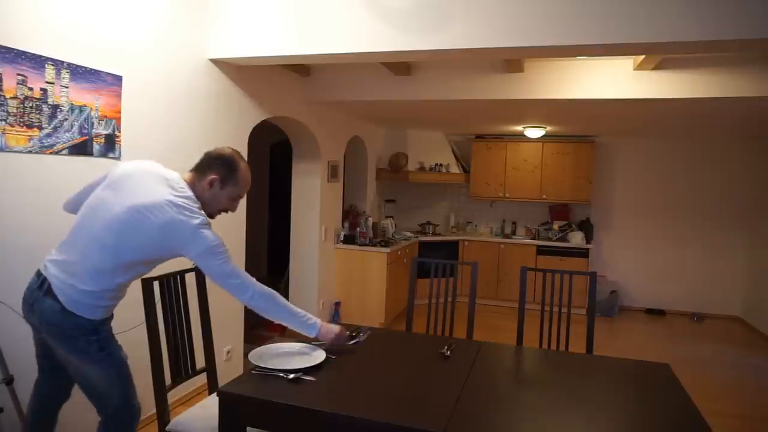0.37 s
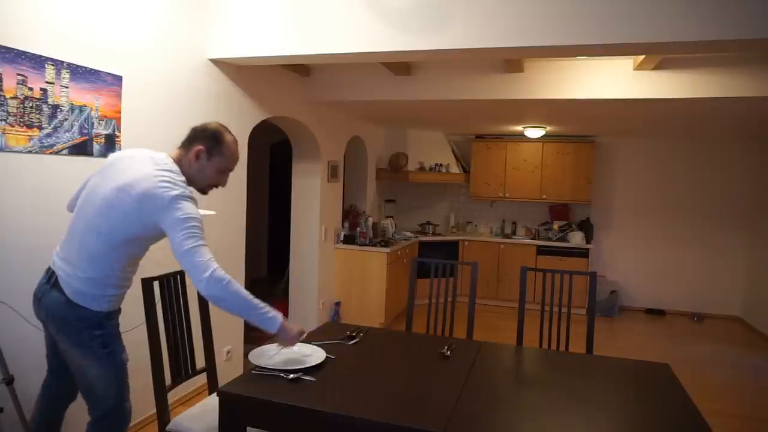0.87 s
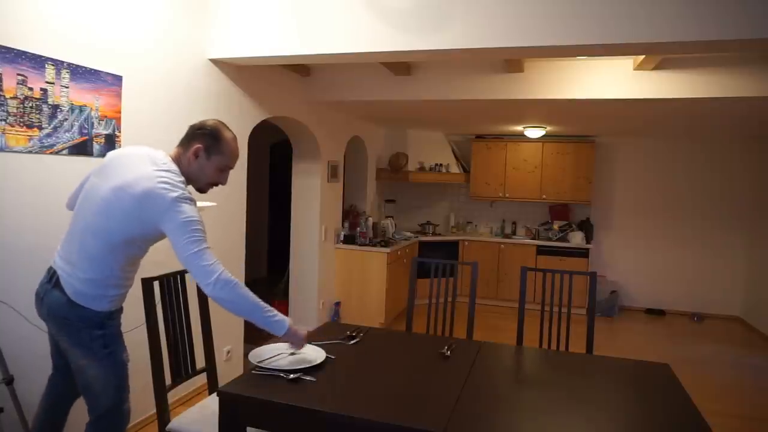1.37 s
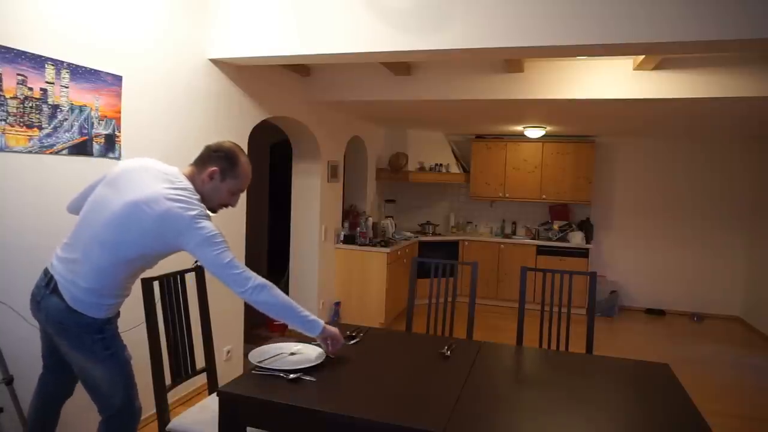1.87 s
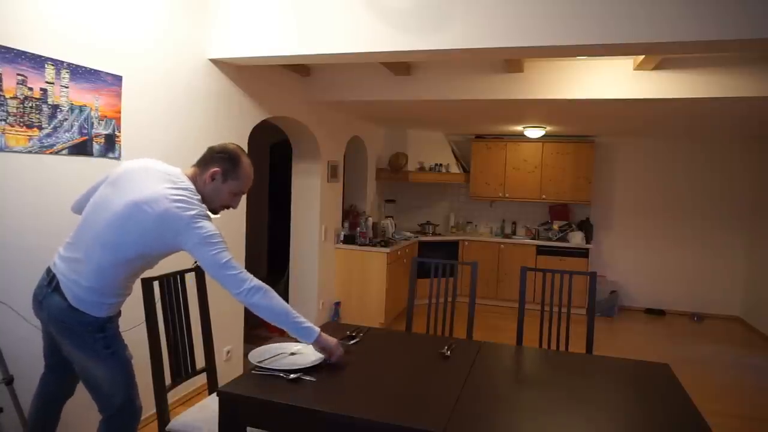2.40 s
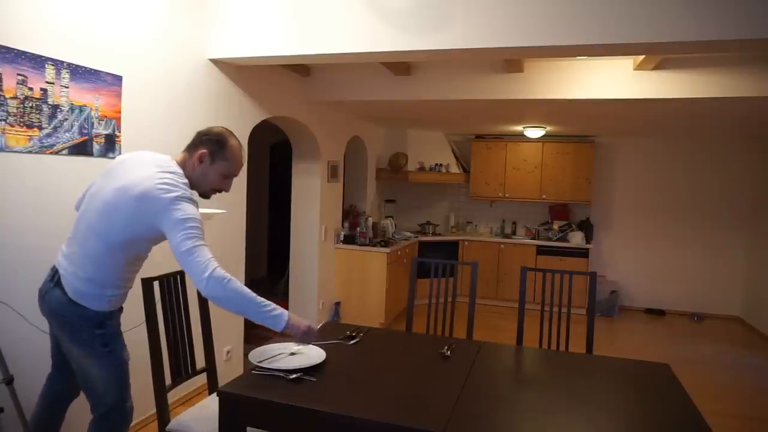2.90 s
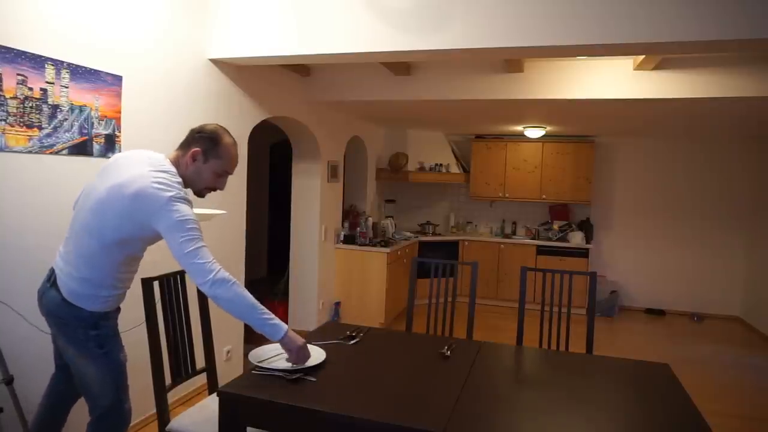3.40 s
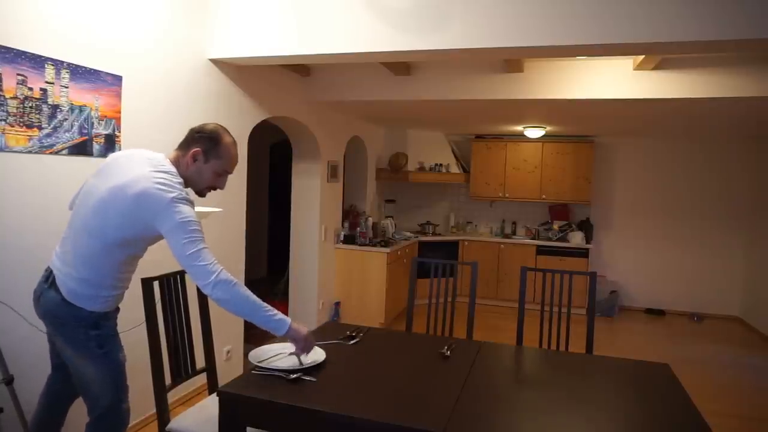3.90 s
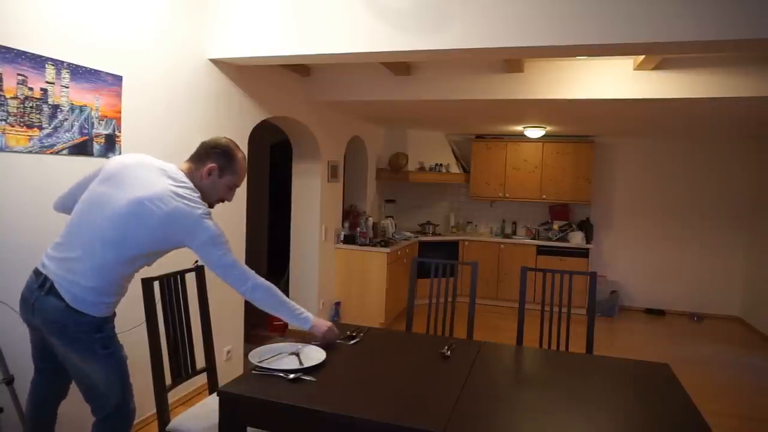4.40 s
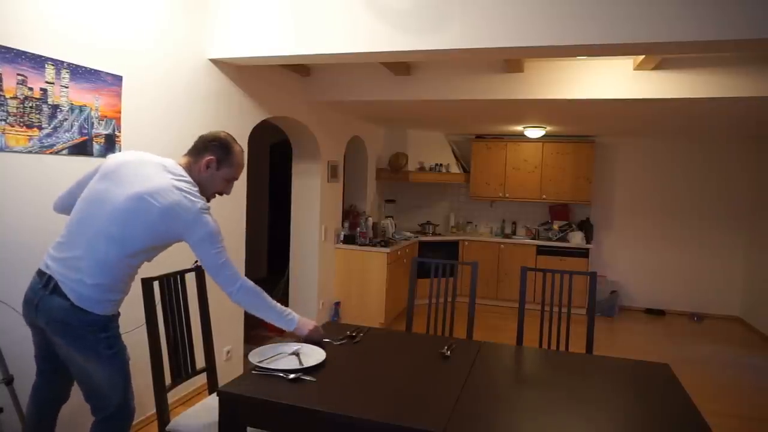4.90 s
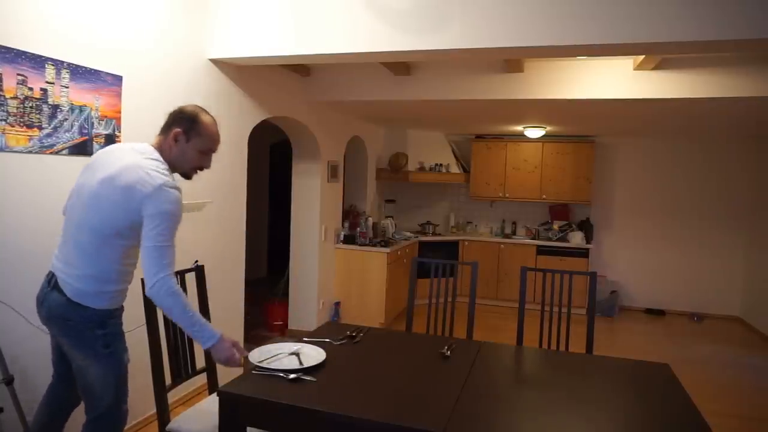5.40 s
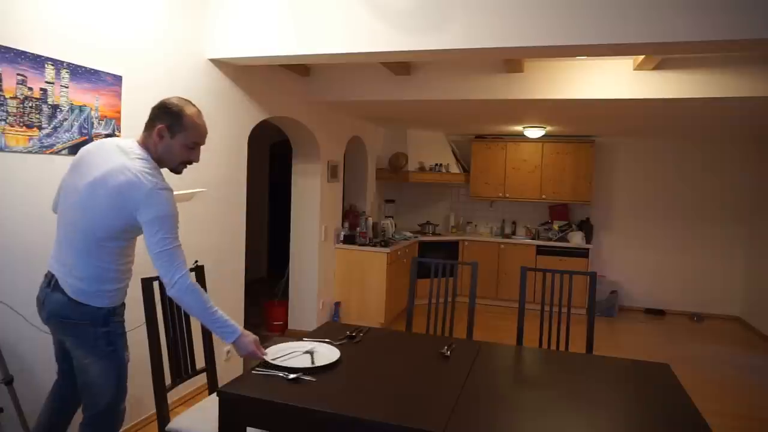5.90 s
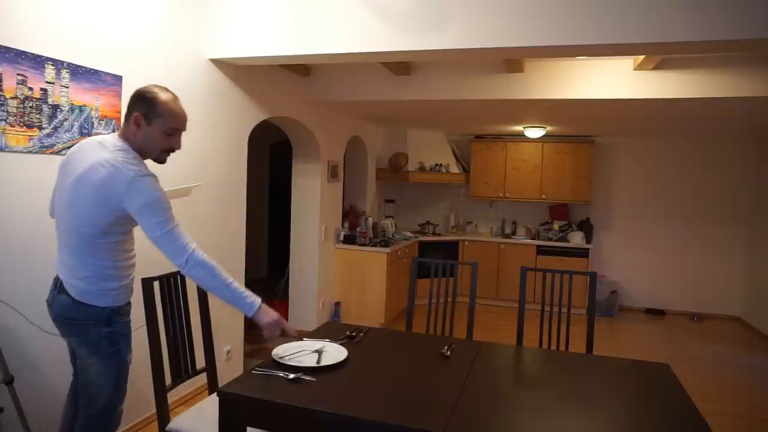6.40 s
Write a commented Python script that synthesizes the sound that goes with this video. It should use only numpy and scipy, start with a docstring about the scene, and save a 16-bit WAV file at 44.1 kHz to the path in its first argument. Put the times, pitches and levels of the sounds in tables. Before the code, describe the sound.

A quiet, bare dining room with an audible echo of well under a second, heard from a few metres away over faint room tone and hiss. Soft cloth rustle and tiny low taps open the scene. Around 0.5-0.7 s a knife scrapes on the wooden table and knocks it in quick, hard clacks, with a thin steel ring. From 1.2 to 1.7 s it meets a ceramic plate: bright clinks, a clear one at 1.4, then a bounce and short scrape at 1.6. A faint touch comes at 2.0. Between 2.3 and 2.8 s a fork drags gritty and rattling off the wood. At 3.7 s it lands with a sharp, damped clink and scrape; smaller clinks and rattles follow until 4.1. A weak drag comes near 4.8, a little tap at 5.0 with light rustling, then from 5.9 to 6.4 s the plate rubs and drones along the table, ending in a tiny knife ring.

```python
"""Cutlery and a plate on a wooden table

In a bare, echoing dining room cutlery is dragged off a wooden table, knocked on it and laid on a ceramic
plate, where it clinks, bounces, scrapes and rattles; at the end the plate is pulled along the table top.
Blows and rough, gritty forces set the resonances of plate, steel and wood ringing; small taps, thumps and
two short knife rings are single damped swings. The microphone is a few metres away, so the room's tail
carries much of every sound. A soft rustle of movement, room tone and hiss lie underneath."""
import sys
import numpy as np
from scipy import signal
from scipy.fft import rfft, irfft
from scipy.io import wavfile

SR = 44100
rng = np.random.default_rng(int(sys.argv[2]) if len(sys.argv) > 2 else 0)


def decibels_to_gain(level_db):
    """Convert a level in decibels to a linear amplitude gain (20 dB per decade)."""
    exponent = np.asarray(level_db, float) / 20
    return 10 ** exponent


def inscribe(sig):
    """Save sig as 16-bit PCM at rate SR to the path in sys.argv[1].

    A 1-D sig is mono; a 2-D sig holds one channel per row.
    Samples are clipped to [-1, 1] before scaling.
    """
    pcm = np.round(np.clip(np.atleast_2d(sig).T, -1, 1) * 32767)
    wavfile.write(sys.argv[1], SR, pcm.astype(np.int16))


N = 287664  # length in samples


def unit(x):
    """Scales a signal to rms 1."""
    return x / np.sqrt(np.mean(x ** 2) + 1e-20)


def energy_one(h):
    """Scales an impulse response to energy 1."""
    return h / np.linalg.norm(h)


def along(points, hz):
    """Reads (Hz, value) points on a logarithmic frequency axis."""
    f, v = np.transpose(points)
    return np.interp(np.log(hz + 1), np.log(f + 1), v)


def strokes(tables):
    """Gives one gain per sample for each dB column, silent outside the strokes."""
    t = np.arange(N) / SR
    total = 0
    for table in tables:
        s, *columns = np.transpose(table)
        total = total + decibels_to_gain(np.array([np.interp(t, s, db, left=-200, right=-200) for db in columns]))
    return total


def stroke(start, hardest, end, db, rise_db, fall_db):
    """A stroke swells to its hardest moment and slackens until contact is lost."""
    return strokes([[(start, db - rise_db), (hardest, db), (end, db - fall_db)]])[0]


def ringing(modes, spot=None):
    """Impulse response of a body; a blow near a mode's nodal line excites that mode less."""
    hz, width, db = np.transpose(modes)[:, :, None]
    t = np.arange(SR // 4) / SR
    order = np.arange(1, len(hz) + 1)[:, None]
    reach = 1 if spot is None else .25 + np.cos(np.pi * spot * order) ** 2
    decay = np.exp(-np.pi * abs(width) * t)  # a wide resonance dies fast
    swing = (-1) ** order * decay * np.sin(2 * np.pi * hz * t)  # neighbours start in opposite phase
    onset = 1 - np.exp(-t / .0005)  # the wave needs a moment to fill the body
    return energy_one(onset * np.sum(reach * decibels_to_gain(db) * width * swing, 0))


def colour(points):
    """Short causal impulse response with the given spectrum, made by folding its cepstrum forward."""
    spectrum = decibels_to_gain(along(points, np.fft.rfftfreq(4096, 1 / SR)))
    cepstrum = irfft(np.log(spectrum + 1e-6))
    cepstrum[1:2048] *= 2
    cepstrum[2049:] = 0
    response = irfft(np.exp(rfft(cepstrum)))
    return energy_one(np.pad(response, (0, SR // 4 - len(cepstrum))))


def through(force, body):
    """A force sounding through an impulse response."""
    return signal.fftconvolve(force, body)[:N]


def grit(size, spiky):
    """Force of a rough contact: noise whose grains are of very uneven size."""
    return unit(rng.standard_normal(size) * np.exp(spiky * rng.standard_normal(size)))


def rubbing(gains, bodies, spiky):
    """One gritty force drives every body in contact."""
    force = grit(N, spiky)
    return sum(through(gain * force, body) for gain, body in zip(gains, bodies))


def blow(chatter_s):
    """One push with the dying chatter of micro-bounces after it, and that chatter alone."""
    t = np.arange(SR // 10) / SR
    envelope = (1 - np.exp(-t / .002)) * np.exp(-t / max(chatter_s, .001))
    chatter = energy_one(grit(len(t), spiky=.4) * envelope)
    push = energy_one((t == 0) + .5 * chatter)
    return 8 * push, 8 * chatter


def add(out, s, sound):
    """Mixes a sound in at a time in seconds."""
    part = out[round(s * SR):][:len(sound)]
    part += sound[:len(part)]


# Colour of the room tone and hiss. Each row: frequency in Hz, density in dB per Hz.
QUIET_COLOUR = [(28, -14), (40, -6.5), (55, -7), (268, -12.5), (620, -20.5), (1390, -20.5), (5000, -30.5),
                (15800, -41.5)]


def quiet():
    """Room tone and microphone hiss: steady noise with a fixed colour."""
    return decibels_to_gain(-65.5) * through(rng.standard_normal(N), colour(QUIET_COLOUR))


# Bursts of movement, each a list of points. Each row: time in seconds, level in dB.
RUSTLES = [
    [(0.0, -55), (0.096, -62.5), (0.416, -68.5), (0.46, -62)],
    [(5.0, -59.5), (5.334, -63), (5.576, -66.5), (5.69, -91)],
]
# Colour of moving cloth. Each row: frequency in Hz, density in dB per Hz.
CLOTH_COLOUR = [(100, -14), (200, -40), (310, 3), (420, -9), (660, -3.5), (1470, -11.5), (1940, -10),
                (8000, -36.5), (12000, -58)]


def rustle():
    """The person moving: a soft, gritty noise in the colour of cloth."""
    return rubbing(strokes(RUSTLES), [colour(CLOTH_COLOUR)], spiky=0.26)


# How long the room rings. Each row: frequency in Hz, time to fall by 60 dB in seconds.
ROOM_DECAY = [(100, 0.93), (400, 0.75), (1500, 0.75), (4000, 0.66), (8000, 0.42), (15000, 0.33)]


def room(x):
    """Diffuse tail, each frequency dying at its own speed; renewed every 0.2 s as the source moves."""
    out, step = np.zeros(N), SR // 5
    for start in range(0, N, step):
        hz, t, z = signal.stft(rng.standard_normal(SR), SR, nperseg=256)
        decay = decibels_to_gain(-60 * t / along(ROOM_DECAY, hz)[:, None])
        tail = signal.istft(z * decay, SR, nperseg=256)[1]
        # reflections thicken over the first milliseconds
        tail *= 1 - np.exp(-np.arange(len(tail)) / SR / 0.0027)
        add(out, start / SR, signal.fftconvolve(x[start:start + step], energy_one(tail)))
    return out


# Small taps, thumps and two short knife rings.
# Each row: start in seconds, level in dB before build-up and decay, pitch in Hz, cycles to fall by 60 dB.
TAPS_AND_RINGS = [(0.166, -42, 278, 8.1), (0.308, -29, 477, 2.6), (0.641, -31, 124.1, 22),
                  (1.115, -25.5, 212, 1.64), (1.205, -41.5, 129, 14), (1.6, -47, 125, 30),
                  (1.659, -51.5, 156.3, 85), (1.999, -33.5, 210, 6.3), (2.7, -27, 346, 13),
                  (2.954, -28.5, 196, 2.27), (2.988, -53.5, 61.9, 15.6), (3.931, -42, 112, 14),
                  (4.111, -52.5, 77.7, 62), (5.034, -21.5, 2600, 2.9), (5.083, -32.5, 486.6, 6.9),
                  (5.09, -31.5, 2498, 3.8), (6.364, -43, 3600, 150), (6.378, -52, 4550, 200),
                  (6.201, -37, 130.4, 33)]


def taps_and_rings():
    """Each tap, thump or ring is one damped swing that builds within about half a cycle."""
    out, t = np.zeros(N), np.arange(SR // 2) / SR
    for s, db, hz, cycles in TAPS_AND_RINGS:
        envelope = decibels_to_gain(db - 60 * t * hz / cycles) * (1 - np.exp(-2 * hz * t))
        add(out, s, envelope * np.sin(2 * np.pi * hz * t))
    return out


# Resonances of the plate with nothing on it. Each row: frequency in Hz, width in Hz, relative level in dB.
PLATE_MODES = [(1434, 39, -0.5), (1519.6, 21, 0.5), (2470, 17, 2), (2980, 34, -4.5), (3466, 50, -11),
               (3894, 30, 3.5), (4820, 25, -5.5), (5780, 20, 0), (5600, 28, -9), (8210, 22, -17),
               (8890, 16, -9), (9440, 25, -12), (10320, 22, -11), (7710, 20, -15), (12600, 40, -27),
               (13100, 20, -15), (15600, 25, -30), (6870, 20, -9), (8070, 22, -7), (10900, 18, -15),
               (2170, 14, -4), (3580, 34, -7.5)]


def plate(s):
    """The plate's modes at a time; once the fork is laid on it at 3 s they are wider and die sooner."""
    wider = 2.9 if s > 3 else 1
    return [(hz, width * wider, db) for hz, width, db in PLATE_MODES]


# Resonances of the pieces lying on the plate. Each row: frequency in Hz, width in Hz, relative level in dB.
KNIFE_MODES = [(1605, 15, -0.5), (1800, 29, -7.5), (2286, 11, 4), (2915, 91, -8), (3628, 177, -3.5),
               (4550, 55, -4), (6600, 23, -21), (7110, 120, -19), (11500, 69, -21.5)]
FORK_MODES = [(1106, 49, -6), (1200, 18, -5.5), (2044, 32, -8.5), (2587, 60, -4), (3238, 64, 2),
              (3996, 230, -3.5), (5060, 37, -16.5), (6020, 140, -9), (6980, 100, -11.5), (7804, 30, -8),
              (12400, 80, -24)]
# When the fork is the piece on the plate; the knife sounds at other times.
# The one row: start in seconds, end in seconds.
FORK_TIME = 3, 5


def utensil(s):
    """The modes of the piece lying on the plate at a time."""
    return FORK_MODES if FORK_TIME[0] < s < FORK_TIME[1] else KNIFE_MODES


# Resonances of pieces held by the handle (they ring more freely), and with blade or tines on the wood.
# Neighbouring rows take turns in a drag. Each row: frequency in Hz, width in Hz, relative level in dB.
KNIFE_HELD_MODES = [(4340, 7, 10), (3270, 80, 0), (7220, 3, -12), (9610, 25, -18), (11230, 26, -20),
                    (13700, 40, -28)]
KNIFE_ON_WOOD_MODES = [(3370, 57, -1), (3960, 48, -12.5), (7520, 49, 0), (9400, 55, -14.5),
                       (11700, 80, -13), (13700, 34, -14.5), (14750, 40, -21)]
FORK_HELD_MODES = [(3290, 70, 8), (5710, 70, -3), (7210, 50, -4), (7830, 40, -3), (9590, 60, -12),
                   (11250, 60, -14), (11900, 35, -14), (13720, 45, -19)]
FORK_ON_WOOD_MODES = [(2910, 43, 4), (3270, 100, 0), (4950, 90, 2), (4680, 90, 2), (7910, 80, -10),
                      (5780, 80, -4), (13790, 30, -16), (10100, 80, -15), (11300, 80, -21),
                      (15490, 35, -19)]
KNIFE_LIFTED_S = 1  # later drags are the fork's


def dragged(s):
    """The modes of the piece being taken off the table, which change as it leaves the wood."""
    if s < KNIFE_LIFTED_S:
        return KNIFE_ON_WOOD_MODES if s < .6 else KNIFE_HELD_MODES
    return FORK_ON_WOOD_MODES if s < 2.6 else FORK_HELD_MODES


# The plate's foot sliding on the wood. Each row: time in seconds, pressure in dB.
PLATE_SLIDE = [(5.89, -54), (5.928, -42), (6.022, -43), (6.09, -38), (6.248, -38.5), (6.354, -41),
               (6.38, -45), (6.5, -60)]
# Drone of the table top under the plate's weight. Each row: frequency in Hz, density in dB per Hz.
DRONE_COLOUR = [(110, -19.5), (250, -6.5), (400, -2.5), (800, 0.5), (1100, -24), (4000, -87)]
# Resonances of the table, which other contacts use too.
# Each row: frequency in Hz, width in Hz, relative level in dB.
TABLE_MODES = [(313, 20, -7), (516, 130, -7.5), (550, 60, 0), (677, 130, -1), (813, 120, -3), (964, 41, -3),
               (1086, 27, -8), (1222, 23, -5), (1355, 54, 5.5), (1785, 63, 3), (2226, 130, 4)]
# Colours of rubbing on wood and on glaze, also shared. Each row: frequency in Hz, density in dB per Hz.
WOOD_COLOUR = [(150, -20), (500, -7.5), (970, -1), (1990, -3), (3380, -12), (4020, -19), (15500, -64)]
GLAZE_COLOUR = [(120, -20), (450, -12.5), (1300, -6), (2800, -4), (5400, -15.5), (8000, -19.5),
                (15500, -36)]


def slide():
    """The plate's foot rubs the wood, drones in the top and shakes modes of plate and fork,
    each coming and going at random."""
    flicker_db, flicker_hz = 7, 8  # size and speed of the random changes
    press, = strokes([PLATE_SLIDE])
    laden = plate(PLATE_SLIDE[0][0])
    modes = laden[5:7] + laden[9:12] + FORK_HELD_MODES[1:3]
    knots = rng.standard_normal((len(modes), int(N * flicker_hz / SR) + 4))
    at = np.arange(N) * flicker_hz / SR
    peak = np.array([decibels_to_gain(db) * np.sqrt(abs(width)) for hz, width, db in modes])
    share = peak / np.linalg.norm(peak)
    gains = []
    for k, part in zip(knots, share):
        flicker = flicker_db * np.interp(at, np.arange(len(k)), k)
        gains.append(press * decibels_to_gain(-21 + flicker) * part)
    drone = press * (press / press.max()) ** 0.36  # the drone outgrows the pressure
    rub = decibels_to_gain(-4) * colour(WOOD_COLOUR) + decibels_to_gain(-22.5) * colour(GLAZE_COLOUR)
    low = colour(DRONE_COLOUR) + 0.11 * ringing(TABLE_MODES[:5])
    bodies = [low, rub] + [ringing([mode]) for mode in modes]
    return rubbing([drone, press] + gains, bodies, spiky=0.68)


# Steel scraping or rattling on the plate. Each row: start in seconds, hardest moment in seconds,
# end in seconds, force in relative dB, plate ring over utensil ring in dB.
SCRAPES_AND_RATTLES = [(1.588, 1.61, 1.684, -24.5, -1.5), (3.701, 3.736, 3.732, -17, -6.5),
                       (3.924, 3.935, 4.07, -31, -6.5), (4.004, 4.016, 4.03, -35, 11),
                       (4.078, 4.1, 4.137, -27.5, -1), (6.342, 6.388, 6.4, -44.5, -5.5)]


def scrapes_and_rattles():
    """Each gritty stroke rings utensil and plate; the moving contact hands over between alternate modes."""
    out, glaze = 0, .5 * colour(GLAZE_COLOUR)
    for start, hardest, end, db, plate_db in SCRAPES_AND_RATTLES:
        force = stroke(start, hardest, end, db, rise_db=13, fall_db=32)
        moved = np.interp(np.arange(N) / SR, [start, 2 * hardest - start], [0, np.pi / 2])
        bodies = []
        for first in (0, 1):
            steel = ringing(utensil(start)[first::2])
            ceramic = decibels_to_gain(plate_db) * ringing(plate(start)[first::2])
            bodies.append(steel + glaze + ceramic)
        gains = [force * np.cos(0.7 * moved), force * np.sin(0.81 * moved)]
        out = out + rubbing(gains, bodies, spiky=1.0)
    return out


# Cutlery dragged over the wood. Each row: start in seconds, hardest moment in seconds, end in seconds,
# force in relative dB, favoured pitch of the table in octaves above 1 kHz.
TABLE_DRAGS = [(0.498, 0.531, 0.64, -36.5, -0.28), (0.634, 0.652, 0.69, -27.5, 0.81),
               (2.286, 2.403, 2.636, -45, -0.32), (2.481, 2.505, 2.61, -26.5, 0.48),
               (2.558, 2.62, 2.795, -36, -1.36), (2.65, 2.681, 2.736, -26.5, 0.63),
               (4.754, 4.79, 5.13, -45, -0.085)]


def drags():
    """Knife first, then fork; as the contact crosses nodal lines, even and odd modes take turns."""
    rise_db, fall_db = 6, 9.5  # growth up to the hardest moment, loss after it
    nodes_per_s, even_at_s = 7.1, 2.9  # nodal lines crossed, a moment when even modes are strongest
    table_swing_db, steel_swing_db = 5, 5.5  # how far each set of modes swings up and down
    favour_db = 8  # loss of a table mode one octave from the favoured pitch, growing with the square
    steel_grows = 0.47  # dB that the rattle gains, beyond the force itself, for each dB of force
    steel_db_per_octave = 5  # a drag that favours high table modes is light and rattles the steel more
    out = np.zeros(N)
    grain = 0.33 * colour(WOOD_COLOUR)
    hiss = 0.55 * colour(GLAZE_COLOUR)  # bright grit of steel on varnish
    for start, hardest, end, db, octaves in TABLE_DRAGS:
        table = []
        for hz, width, level in TABLE_MODES:
            away = np.log2(hz / 1000) - octaves
            table.append((hz, width, level - favour_db * away ** 2))
        t = np.arange(start, end, 1 / SR)
        swell = np.interp(t, [start, hardest, end], [db - rise_db, db, db - fall_db])
        force = decibels_to_gain(swell) * grit(len(t), spiky=0.87)
        grip = force * (1 - np.exp((start - t) / .02))  # the wood takes a moment to grip
        turn = np.cos(np.pi * nodes_per_s * (t - even_at_s))
        steel = dragged(start)
        piece_db = 3 if start < KNIFE_LIFTED_S else 1.5  # knife, then fork
        steel_db = steel_db_per_octave * octaves + piece_db + steel_grows * db
        for first, sign in (1, 1), (0, -1):  # even modes, then odd ones
            rub = grip * decibels_to_gain(table_swing_db * (sign * turn - 1))
            add(out, start, through(rub, ringing(table[first::2]) + grain))
            rattle = force * decibels_to_gain(steel_db + steel_swing_db * (sign * turn - 2))
            add(out, start, through(rattle, ringing(steel[first::2]) + hiss))
    return out


# The knife knocking on the wood. Each row: start in seconds, clack in relative dB,
# steel ring in relative dB, table knock in relative dB, chatter decay in seconds.
WOOD_KNOCKS = [(0.4746, -40, -50.5, -39, 0.029), (0.5067, -26, -49, -46, 0.021),
               (0.618, -10.5, -52.5, -38, 0.0074), (0.6359, -10.5, -35.5, -13.5, 0.0057),
               (.659, -6, -35.5, -36, 0.013)]


def knocks():
    """Steel meets wood: a dull clack, a faint steel ring and the table's body."""
    out = np.zeros(N)
    for s, clack_db, steel_db, knock_db, chatter_s in WOOD_KNOCKS:
        push, chatter = blow(chatter_s)
        add(out, s, decibels_to_gain(clack_db) * through(chatter, colour(WOOD_COLOUR)))
        steel = decibels_to_gain(steel_db) * ringing(dragged(s), spot=0.23)  # where the blade meets the wood, 0-1 along it
        add(out, s, through(push, steel + decibels_to_gain(knock_db) * ringing(TABLE_MODES)))
    return out


# Contacts of steel on the plate. Each row: start in seconds, plate ring in relative dB,
# utensil ring in relative dB, chatter decay in seconds,
# spot as a 0-1 position that sets which plate modes are weakened.
PLATE_CLINKS = [(1.1983, -13.5, -52, 0.004, 0.01), (1.2746, -24.5, -38.5, 0.02, 0.1),
                (1.381, -15, -11, 0.0085, 0.27), (1.583, -18, -55, 0.03, 0.17),
                (1.9941, -35, -60, 0.0074, 0.18), (3.7, -17, -19, 0.014, 0.35),
                (3.7128, -23, -19, 0.012, 0.39), (3.928, -30.5, -35, 0.008, 0.28),
                (4.0057, -51, -23.5, 0.0079, 0.3), (4.0882, -19.5, -38.5, 0.04, 0.64),
                (4.0982, -22, -20, 0.0071, 0.3)]
# The plate pushed down on the table by a heavy contact. Each row: start in seconds, level in relative dB.
PLATE_SETTLES = [(1.1987, -24.5), (1.5828, -27.5), (1.9957, -33), (3.7, -20), (4.0878, -28.5)]


def clinks():
    """Steel meets glaze: a push rings plate and utensil, chatter crackles, heavy contacts knock the table."""
    out, table = np.zeros(N), ringing(TABLE_MODES[:6])
    for s, plate_db, steel_db, chatter_s, spot in PLATE_CLINKS:
        push, chatter = blow(chatter_s)
        # a softer blow is duller: 0.1 dB an octave for each dB below a hard one
        tilt_db = .1 * max(-14 - plate_db, 0)
        dulled = [(hz, width, db - tilt_db * np.log2(hz / 1000)) for hz, width, db in plate(s)]
        add(out, s, decibels_to_gain(plate_db) * through(push, ringing(dulled, spot)))
        add(out, s, decibels_to_gain(steel_db) * through(push, ringing(utensil(s))))
        crackle_db = max(plate_db - 23, steel_db - 2)  # chatter noise under the rings
        add(out, s, decibels_to_gain(crackle_db) * through(chatter, colour(GLAZE_COLOUR)))
    for s, db in PLATE_SETTLES:
        push, _ = blow(chatter_s=0.0093)  # chatter of the plate's foot
        add(out, s, decibels_to_gain(db) * through(push, table))
    return out


def scene():
    """All that happens on the table, direct and through the room, over the quiet background."""
    near = clinks() + knocks() + drags() + scrapes_and_rattles() + slide()
    no_bass = signal.butter(4, 110, "high", fs=SR, output="sos")  # small things radiate no deep bass
    near = signal.sosfilt(no_bass, near)
    small = taps_and_rings()
    direct = decibels_to_gain(-1.5) * near + small
    echo = room(decibels_to_gain(-1.0) * near + decibels_to_gain(-9.0) * small)
    return (direct + echo + quiet() + rustle())[None]


def roll_off(x):
    """The treble ends steeply here."""
    return signal.sosfilt(signal.butter(12, 15980, fs=SR, output="sos"), x)


def record(dry):
    """Limits the band to below about 15.7 kHz and finishes the mix."""
    band_limit = signal.ellip(8, .5, 60, 15700, fs=SR, output="sos")
    mix = signal.sosfilt(band_limit, dry)
    return roll_off(mix)


dry = scene()
out = record(dry)
inscribe(out)
```